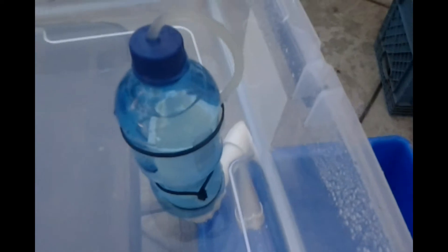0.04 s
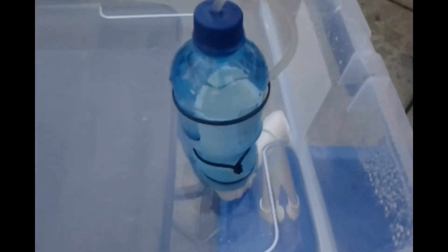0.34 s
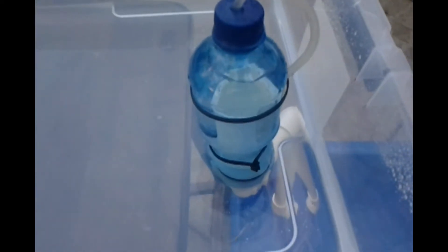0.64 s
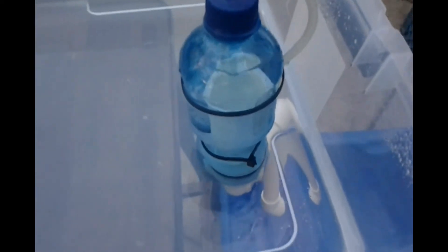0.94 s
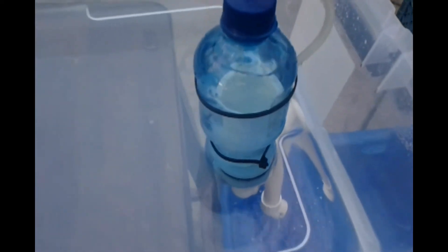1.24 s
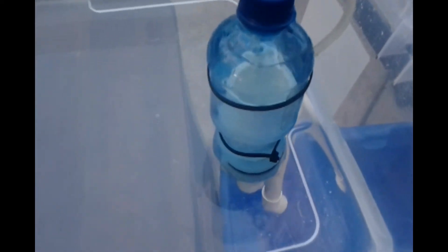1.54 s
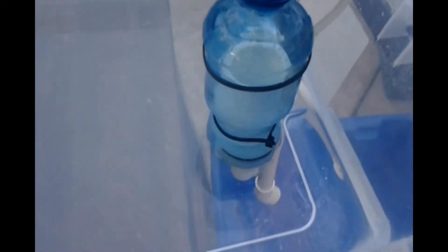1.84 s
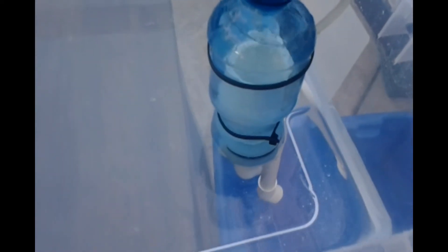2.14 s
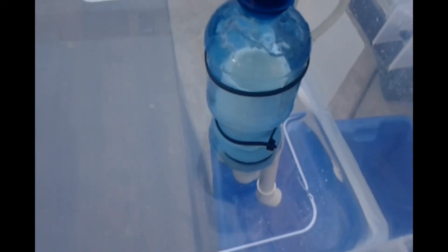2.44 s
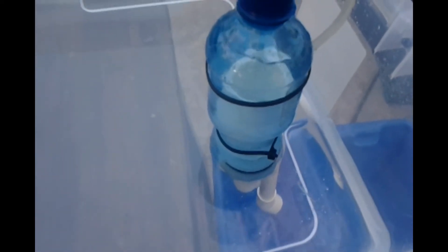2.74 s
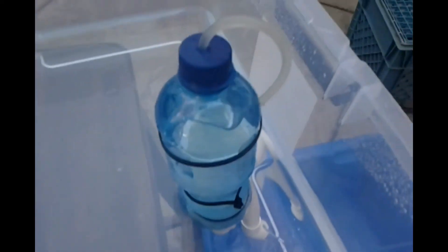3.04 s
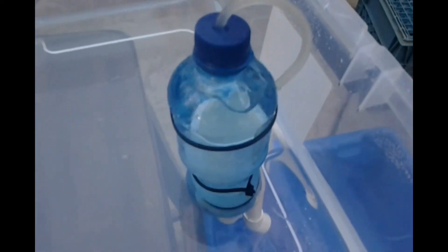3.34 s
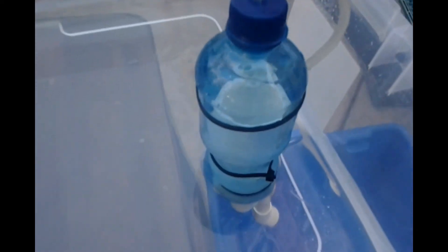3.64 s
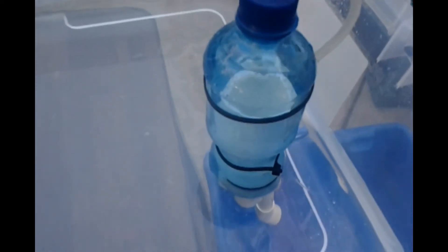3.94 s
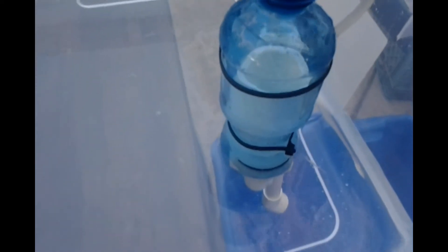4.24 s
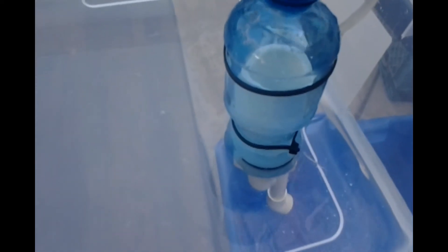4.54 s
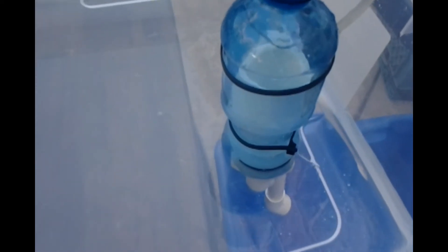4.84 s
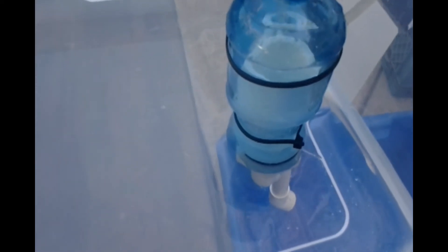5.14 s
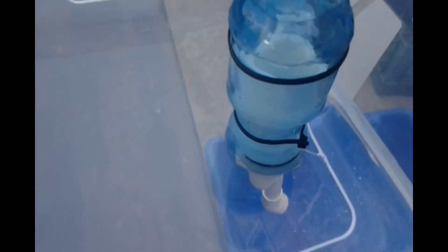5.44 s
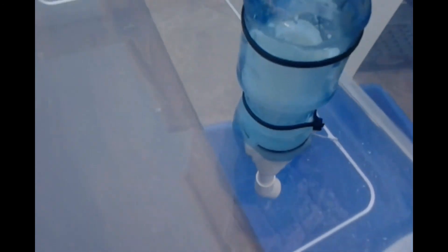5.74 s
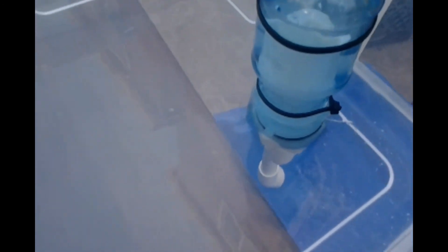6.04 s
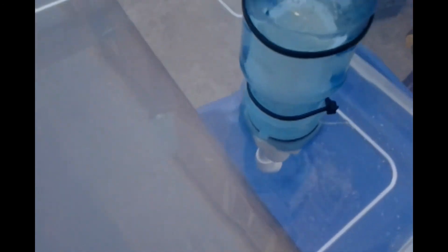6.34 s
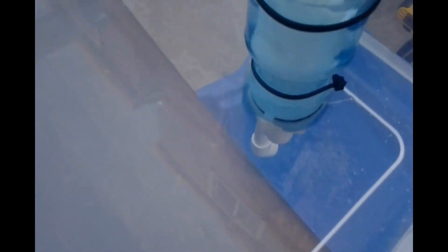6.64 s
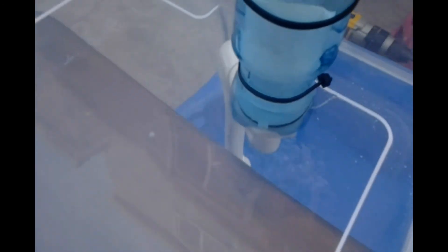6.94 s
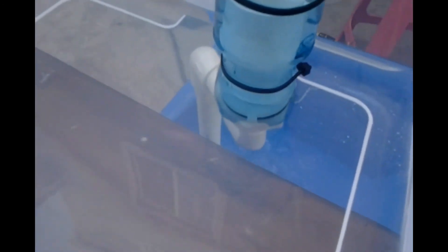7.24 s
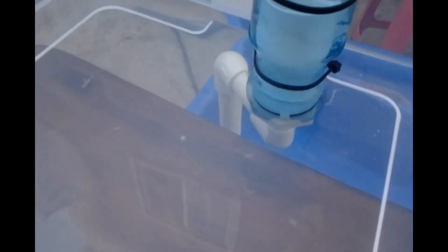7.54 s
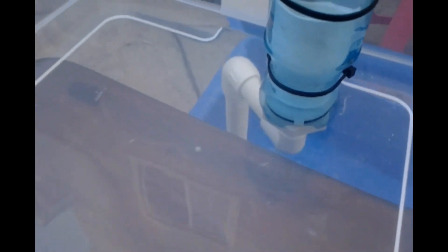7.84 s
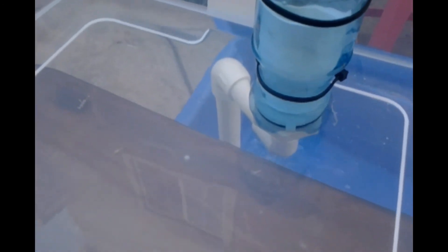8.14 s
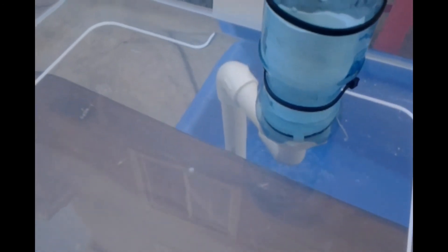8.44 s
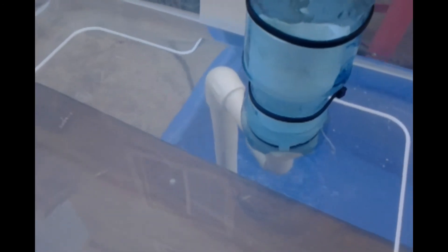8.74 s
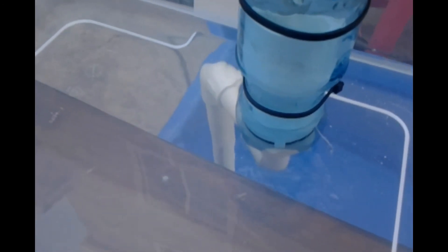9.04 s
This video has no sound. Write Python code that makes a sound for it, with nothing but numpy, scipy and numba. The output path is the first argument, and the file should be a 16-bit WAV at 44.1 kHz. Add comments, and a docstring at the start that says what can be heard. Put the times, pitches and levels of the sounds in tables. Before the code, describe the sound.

Two sharp plastic clicks open as a jet of water falls from a pipe into a plastic bucket. It splashes in uneven gushes, with fizzing spray, many bright plinks and occasional plops. Soft knocks and rubs of a hand on the microphone come in between. The flow gradually weakens, hisses briefly and thins out, and plastic rattles at the end. The sound is close, in a yard with very little echo.

```python
"""A siphon empties a plastic tub into a bucket below. At the start, hard plastic clicks as a hand
bumps the small recorder. All along, the jet of water drags air under, and the bubbles ring: tiny ones
fizz, single ones plink, bigger ones plop. Uneven splashes and soft knocks of the hand come in between.
The flow weakens, gives a short hiss at about 7.5 s and thins out. At 9 s the plastic rattles."""
import sys
import numpy as np
from scipy import signal
from scipy.fft import rfft, irfft, next_fast_len
from scipy.io import wavfile
from numba import njit

SR = 44100
rng = np.random.default_rng(int(sys.argv[2]) if len(sys.argv) > 2 else 0)


def output_pcm(signal):
    """Save a mono or channel-first signal as 16-bit PCM at the path in sys.argv[1].

    Samples are clipped to [-1, 1] before scaling.
    """
    pcm = np.clip(np.atleast_2d(signal).T, -1, 1) * 32767
    wavfile.write(sys.argv[1], SR, np.round(pcm).astype(np.int16))


N = 401307
TIME = np.arange(N) / SR

# soft knocks on the recorder's case: start_s, level_db, pitch_hz
KNOCKS = [(1.491, -32, 500), (1.521, -40, 300), (2.207, -16, 452), (2.238, -15, 570), (2.296, -33, 500),
          (2.617, -31.5, 314), (3.093, -36, 344), (3.672, -36, 380), (6.429, -45, 220), (6.832, -39, 298),
          (7.674, -47, 236), (8.883, -33.5, 257), (8.987, -29.5, 282)]
# fingers shifting on the case: centre_s, half_length_s, level_db
RUBS = [(1.512, 0.05, -48.5), (1.852, 0.45, -61.5), (2.27, 0.091, -55), (2.69, 0.27, -64),
        (3.133, 0.085, -48.5), (3.658, 0.085, -50), (4.3, 0.21, -59.5), (7.0, .2, -69), (5.7, 0.26, -72.5),
        (7.713, 0.1, -58.5), (8.5, 0.65, -73)]
# hard plastic clicks: start_s, level_db, brightness_db_per_octave, ring_length_factor, thump_db
CLICKS = [(0.137, -4.5, -3.5, 0.38, -2), (.147, -1.5, 0.5, 0.5, -2), (8.9992, -14.5, -4.5, 1.1, -31),
          (9.04, -7.5, -0.5, 0.44, -22), (9.0485, -13.5, -4, 1.1, -33), (9.0605, -10.5, -2, 0.53, -30),
          (9.069, -13, 0, 0.48, -25), (9.0802, -10, -2, 0.85, -26), (9.0945, -9.5, -2, 0.85, -26)]
# the notes the plastic rings with: pitch_hz, level_db, fade_ms
PLASTIC_NOTES = [(650, -12, 6), (1050, -10.5, 9.4), (1264, 0, 6), (1980, -7.5, 12), (2340, -7, 13),
                 (2800, 2, 5.3), (3250, 6.5, 2.9), (3400, -2, 1.1), (4310, 3, 7.9), (5270, 1, 5.5)]
# bigger bubbles: start_s, level_db, pitch_hz
PLOPS = [(2.968, -37, 810), (3.271, -29.5, 1150), (3.432, -22, 2900), (3.528, -29, 1244),
         (4.496, -22, 2230), (4.647, -14.5, 2940), (5.091, -34, 1320), (6.104, -19, 2620),
         (6.294, -32, 1540), (6.602, -30, 1540), (6.735, -22, 2580), (7.88, -31, 1780), (8.485, -40.5, 656)]
# the loudest drops, each trapping a small bubble: start_s, level_db, pitch_hz
PLINKS = [(0.1634, -8, 3660), (0.2146, -8, 3080), (0.2443, -8.5, 4160), (0.3386, -10, 3600),
          (0.389, -10, 4800), (0.4738, -7, 4250), (0.5142, -7.5, 4800), (0.5277, -12, 4870),
          (0.5666, -8.5, 3600), (0.5821, -2, 4630), (0.5964, -8.5, 3450), (0.966, -10, 4540),
          (1.0172, -11, 4800), (1.1568, -10, 4840), (1.2196, -9, 4330), (1.4875, -5, 4520),
          (1.5244, -5.5, 4880), (1.5928, -6, 5100), (1.727, -5.5, 5080), (1.7973, -11, 5070),
          (1.9113, -11.5, 4600), (2.0043, -11.5, 4550), (2.2603, -3, 5370), (2.4678, -3.5, 4500),
          (2.6768, -13.5, 4100), (2.7666, -5.5, 4850), (2.821, -13, 4200), (2.8694, -9, 3970),
          (2.9422, -10, 5030), (3.04, -6.5, 4160), (3.0579, -7, 4670), (3.3054, -4, 5170),
          (3.3752, -8, 4810), (3.4421, -2, 4940), (3.5463, -8.5, 4900), (3.8821, -8, 4700),
          (3.9624, -4, 4700), (4.0173, -9, 5000), (4.0317, -9, 4400), (4.1679, -10.5, 4950),
          (4.3829, -8, 5250), (4.7306, -2.5, 4120), (4.8219, -6, 4400), (4.8416, -8, 5600),
          (4.8953, -6, 4730), (5.1277, -11, 4040), (5.256, -4.5, 4900), (5.6384, -9, 4580),
          (5.689, -3, 4780), (5.9828, -7, 4770), (6.3145, -15, 4210), (6.8039, -15, 4800),
          (7.0688, -11.5, 4240), (7.253, -13, 4320), (7.2983, -11, 4080), (7.3322, -13.5, 3930),
          (7.3552, -13.5, 4320), (7.4131, -14, 4380), (8.5555, -15.5, 4760), (8.8124, -7, 4620)]
# strength of the jet: time_s, level_db
FLOW = [(0.0, -29.5), (0.42, -27), (0.65, -29.5), (1.08, -28.5), (2.15, -32.5), (2.35, -29), (2.73, -34),
        (2.98, -30), (4.61, -31), (5.06, -30), (5.59, -32.5), (6.64, -35), (7.04, -35), (7.44, -34.5),
        (7.72, -37.5), (8.17, -40.5), (8.92, -39.5), (9.0, -34)]
# moments when the jet falters: centre_s, dip_db
LULLS = [(0.18, -8.5), (0.741, -4.5), (1.352, -4), (2.17, -2), (2.431, -0.5), (5.8, -0.5), (6.97, -8.5)]
# the biggest gushes hitting the pool: peak_s, rise_ms, spray_db, gurgle_db
SPLASHES = [(0.015, 15, -20, -31), (0.069, 20, -26, -34), (0.225, 33, -22, -36), (0.417, 10, -24, -38),
            (0.53, 10, -15.5, -38), (0.598, 11, -27, -49), (0.787, 7.1, -18, -31), (1.023, 6.6, -15, -28),
            (1.112, 12, -21.5, -33), (1.226, 8.1, -31, -31), (1.44, 41, -19.5, -27.5),
            (1.507, 13, -15, -26.5), (1.739, 23, -21.5, -30), (1.86, 26, -23, -48.5), (1.932, 15, -25, -38),
            (2.002, 5, -18, -49), (2.113, 13, -25, -31.5), (2.354, 18, -20.5, -25), (2.559, 6.5, -23, -41),
            (2.766, 8, -20, -37), (2.827, 9, -19, -48), (3.01, 17, -23, -41), (3.105, 9.8, -21, -49),
            (3.268, 5.9, -16, -44), (3.383, 22, -18, -31), (3.455, 7.8, -32, -42),
            (3.825, 39, -22.5, -31.5), (4.249, 4.6, -19, -26), (4.298, 11, -20, -48),
            (4.45, 6.3, -17.5, -42), (4.511, 12, -20, -42), (4.658, 27, -23, -34), (4.731, 14, -16, -25.5),
            (4.797, 12, -24, -32), (4.9, 6.3, -19, -29), (4.974, 22, -20.5, -34), (5.246, 17, -17, -28.5),
            (5.479, 6.9, -21.5, -45), (5.581, 7, -18.5, -36), (5.637, 20, -19.5, -28.5),
            (6.0, 7.6, -22, -40), (6.049, 4.6, -19, -41), (6.1, 27, -28, -41), (6.165, 7.8, -23, -39),
            (6.409, 84, -31, -35), (6.487, 7.2, -19.5, -62), (6.631, 17, -20, -27), (6.692, 9.9, -19, -27),
            (6.86, 9.6, -30, -38), (7.025, 20, -31, -40), (7.069, 15, -26.5, -48), (7.806, 8, -28, -50),
            (7.976, 9.8, -24.5, -53), (8.338, 12, -32, -48), (8.412, 29, -33, -54), (8.562, 10, -32.5, -45),
            (8.818, 14, -27, -40)]
# how much splashing is heard straight, not off the tub's walls: time_s, share_0_to_1
DIRECT_SHARE = [(0, 0.96), (7.3, 0.88), (7.7, 0.74), (9, 0.84)]

# tone of the water's hiss, churning, gurgle and spray: pitch_hz, gain_db
RUSH_TONE = [(300, -22), (900, -7.5), (1300, 2), (1700, 1.5), (2200, 2), (3200, 1), (4700, 6), (7000, -16)]
CHURN_TONE = [(60, -30), (130, -9), (200, -8.5), (400, -4), (620, -2), (880, -0.5), (1100, -2.5),
              (1500, -1.5)]
GURGLE_TONE = [(700, -34), (1060, -12.5), (1390, -8.5), (1580, -6.5), (1740, -6.5), (1870, 2.5),
               (1980, -5.5), (2090, 1.5), (2190, -1.5), (2300, 0.5), (2500, -3.5), (2750, -2.5),
               (3200, -35)]
SPRAY_TONE = [(2300, -26.5), (2750, -5.5), (3020, 0.5), (3350, -7), (3700, -6), (4100, -1.5), (4850, -1),
              (5400, -7), (7000, -4)]
# tone of rubbing skin, knocks and clicks: pitch_hz, gain_db
SKIN_TONE = [(30, -11), (70, 1), (110, 2.5), (220, 2.5), (400, -3.5), (1200, -12.5), (3000, -30)]
KNOCK_TONE = [(40, -29), (100, -12), (280, 1), (1400, 8.5), (2400, -13)]
CLICK_TONE = [(100, -43), (400, -14), (800, 0)]
# what the microphone lets through, and what the converter mirrors upwards: pitch_hz, gain_db
MICROPHONE_TONE = [(25, -2), (110, 0), (4900, 2.5), (5500, 0.5), (6000, -4.5), (6500, -13.5), (7000, -16.5),
                   (7600, -20), (8100, -66)]
MIRROR_TONE = [(1000, -75), (2000, -49.5), (3000, -38), (4900, -30.5), (7000, -24.5)]


def undb(db):
    """Turn decibels into a number to multiply by."""
    return 10 ** (np.asarray(db) / 20)


def unit(x):
    """Scale a sound to an average (rms) level of 1."""
    return x / np.sqrt(np.mean(x ** 2))


def colour(x, tone):
    """Make some pitches louder and others softer, following a tone table."""
    hz, db = np.transpose(tone)
    size = next_fast_len(len(x) + 4096)
    all_hz = np.maximum(np.fft.rfftfreq(size, 1 / SR), 1)
    gain = undb(np.interp(np.log(all_hz), np.log(hz), db))
    return irfft(rfft(x, size) * gain, size)[:len(x)]


def add(out, start_s, sound):
    """Mix a sound in at start_s."""
    i = int(np.clip(start_s * SR, 0, N - 1))
    out[i:i + len(sound)] += sound[:N - i]


def swell(centre_s, half_length_s):
    """A smooth rise to 1 and back."""
    return np.exp(-((TIME - centre_s) / half_length_s) ** 2)


@njit
def rings(starts_s, gains, pitches_hz, fades_s, glide, onset_cycles):
    """Tones that swell and fade. Glide lifts their pitch, as when a bubble nears the surface."""
    out = np.zeros(N)
    for k in range(len(starts_s)):
        start, life = int(starts_s[k] * SR), fades_s[k] * SR
        angle = 2 * np.pi * pitches_hz[k] / SR
        wave = gains[k] + 0j
        step = np.exp(1j * angle - 1 / life)  # turns and shrinks the wave each sample
        bend = np.exp(1j * angle * glide / life)
        muted, opening = 1., np.exp(-pitches_hz[k] / (onset_cycles * SR))
        for i in range(max(start, 0), min(start + int(6 * life), N)):
            wave *= step
            step *= bend
            muted *= opening
            out[i] += wave.imag * (1 - muted)
    return out


def cloud(per_s, low_hz, high_hz, cycles, scatter_db):
    """Countless short tones of random strength and pitch, like a swarm of bubbles."""
    when, pitch, size, life = rng.random((int(per_s * N / SR), 4)).T
    hz = low_hz + (high_hz - low_hz) * pitch
    gains = undb(-scatter_db * np.log(size + .025)) * hz  # many weak, few strong, none huge
    fades_s = cycles * 2 ** (2 * life - 1) / hz
    return unit(rings(when * N / SR, gains, hz, fades_s, glide=0.021, onset_cycles=cycles * 0.19))


def echoes(x, delay_s, length_s, db, drift_hz=.9):
    """Many echoes that die away; their pattern drifts as the recorder is moved about."""
    t = TIME[:int(SR * length_s)]
    fade = np.exp(-np.log(1000) * t / length_s) * (t > delay_s)
    tails = rng.standard_normal((2, SR))[:, :len(t)] * fade
    first, second = (signal.fftconvolve(x, tail / np.linalg.norm(tail))[:N] for tail in tails)
    turn = 2 * np.pi * drift_hz * TIME
    return undb(db) * (first * np.cos(turn) + second * np.sin(turn))


def in_bucket(x):
    """A sound plus its quick echoes from the bucket's walls."""
    return x + echoes(x, delay_s=0.0012, length_s=0.024, db=-4)


def hand(resting_db=-69, scuff_db=-41.5, scuff_s=0.015):
    """Dull knocks on the case, and the grainy rub of skin as the fingers shift."""
    starts_s, db, hz = np.transpose(KNOCKS)
    knocks = rings(starts_s, undb(db + 8), hz, 0.35 / hz, glide=0., onset_cycles=0.22)
    rub = undb(resting_db) + sum(undb(level) * swell(at, half) for at, half, level in RUBS)
    scuff = np.exp(-TIME[:SR // 8] / scuff_s)  # skin slides a little after every knock
    for at, knock_db in zip(starts_s, db):
        add(rub, at, undb(scuff_db + 0.5 * (knock_db - db.mean())) * scuff)
    grains = cloud(per_s=240, low_hz=58.7, high_hz=1080, cycles=0.52, scatter_db=3.6)
    return colour(knocks, KNOCK_TONE) + rub * unit(colour(grains, SKIN_TONE))


def clicks(shell_hz=1900, shell_cycles=2.25):
    """Plastic snaps on plastic: a crack, a thump of the shell and a ring that varies with each hit."""
    out, t = np.zeros(N), TIME[:SR // 12]
    hz, note_db, fade_ms = np.array(PLASTIC_NOTES).T[:, :, None]
    age = shell_hz * t / shell_cycles
    thump = np.sin(2 * np.pi * shell_hz * t) * 2 * age * np.exp(-age ** 2)
    for start_s, db, brightness, ring_length, thump_db in CLICKS:
        random_db, detune, phase = rng.standard_normal((3, len(hz), 1))
        gain = undb(note_db + brightness * np.log2(hz / hz[0]) + random_db)
        fade = np.exp(-1000 * t / (fade_ms * ring_length))
        notes = np.sin(2 * np.pi * (hz * (1 + 0.008 * detune) * t + phase))
        ring = np.sum(gain * fade * notes, axis=0)
        crack = undb(-12) * rng.standard_normal(len(t)) * np.exp(-t / 0.0036)
        snap = (ring / np.abs(ring).max() + crack) * (1 - np.exp(-t / 0.0004))
        add(out, start_s, undb(db + 1) * snap / np.abs(snap).max() + undb(thump_db) * thump)
    return colour(out, CLICK_TONE)


def rush():
    """The jet briefly breaks into a smooth hiss."""
    hiss = unit(colour(rng.standard_normal(N), RUSH_TONE))
    return undb(-29) * swell(centre_s=7.54, half_length_s=0.069) * hiss


def plops(cycles=8):
    """Bigger bubbles ring lower and longer than small ones."""
    starts_s, db, hz = np.transpose(PLOPS)
    return rings(starts_s, undb(db + 3.5), hz, cycles / hz, glide=0.022, onset_cycles=1.6)


def plinks(cycles=5.1, delay_s=.0005):
    """Single small bubbles ring brightly, each set off by the tick of a drop."""
    starts_s, db, hz = np.transpose(PLINKS)
    starts_s = starts_s + delay_s
    ring = rings(starts_s, undb(db - 2.5), hz, cycles / hz, glide=0.004, onset_cycles=1.33)
    tick = rings(starts_s, undb(db + 4), hz, np.full(len(hz), .00026), glide=0., onset_cycles=1.35)
    return ring + tick


def churn(flow):
    """The stirred pool bubbles low and quietly, hardly changing with the flow."""
    bubbles = cloud(per_s=1100, low_hz=97, high_hz=1417, cycles=2.47, scatter_db=2.6)
    return undb(-52.5) * unit(flow ** 0.19 * colour(bubbles, CHURN_TONE))


def patter(flow):
    """Droplets patter on the pool, mostly while the jet is strong."""
    drops = cloud(per_s=160, low_hz=3280, high_hz=5610, cycles=4.2, scatter_db=5)
    return undb(-5) * flow * (flow / flow.mean()) ** 0.16 * drops


def gush(rise_ms):
    """Power of one gush over time: a quick rise and a slower fall."""
    rise = rise_ms * SR / 1000
    age = np.arange(int(4 * rise)) / rise - 1
    return np.exp(-np.where(age < 0, age / .5, age / 0.69) ** 2)


def splashing(flow_db, sputters_per_s=9):
    """Each gush stirs up a fine spray of small bubbles and a gurgle of bigger ones."""
    sputter = np.ones(N)  # small gushes come at uneven times
    for k, (late, length, size) in enumerate(rng.random((int(sputters_per_s * N / SR), 3))):
        small_gush = gush(rise_ms=8.2 * (.5 + length)) * undb(-6.5 + 9 * size) ** 2
        add(sputter, (k + late) / sputters_per_s, small_gush)
    spray_power = sputter * undb(flow_db - 2.5) ** 2
    # the gurgle drops only 0.8 dB for each dB of flow, so it outlasts the spray
    gurgle_power = sputter * undb(-37.5 + 0.8 * (flow_db - flow_db.max())) ** 2
    for peak_s, rise_ms, spray_db, gurgle_db in SPLASHES:
        start_s = peak_s - rise_ms / 1000
        add(spray_power, start_s, gush(rise_ms) * undb(spray_db - 3.5) ** 2)
        add(gurgle_power, start_s, gush(rise_ms) * undb(gurgle_db - 2) ** 2)
    small = cloud(per_s=2000, low_hz=2410, high_hz=6730, cycles=2.97, scatter_db=4.03)
    big = cloud(per_s=1000, low_hz=928, high_hz=3000, cycles=4, scatter_db=4)
    spray = np.sqrt(spray_power) * unit(colour(small, SPRAY_TONE))
    gurgle = np.sqrt(gurgle_power) * unit(colour(big, GURGLE_TONE))
    return spray + gurgle


def jet():
    """The stream falls into the bucket and drags air under, growing quieter as the flow weakens."""
    dips_db = sum(db * swell(at, half_length_s=0.016) for at, db in LULLS)
    flow_db = np.interp(TIME, *np.transpose(FLOW)) + dips_db
    flow = undb(flow_db)
    water = splashing(flow_db) + churn(flow) + patter(flow)
    # as the tub hides the bucket, more of the bubbling blurs into a soft hiss
    direct = np.interp(TIME, *np.transpose(DIRECT_SHARE))
    blurred = echoes(water, delay_s=.0015, length_s=0.04, db=2)
    return np.sqrt(direct) * water + np.sqrt(1 - direct) * blurred


def scene():
    """Nearby water and plastic echo faintly around the yard; the hand has no echo."""
    near = jet() + in_bucket(plinks() + plops()) + in_bucket(rush()) + clicks()
    yard = echoes(near, delay_s=.012, length_s=0.15, db=-17)
    return (near + yard + hand())[None]


def record(dry, converter_hz=16000, top_hz=14500):
    """The recorder clips loud peaks and cuts high treble; its slow converter mirrors treble upwards."""
    heard = colour(np.clip(dry[0], -.7, .7), MICROPHONE_TONE)
    mirror = 2 * np.cos(2 * np.pi * converter_hz * TIME) * colour(heard, MIRROR_TONE)
    low_pass = signal.ellip(8, .2, 70, top_hz, fs=SR, output="sos")
    return signal.sosfilt(low_pass, heard + mirror)[None]


dry = scene()
out = record(dry)
output_pcm(out)
```